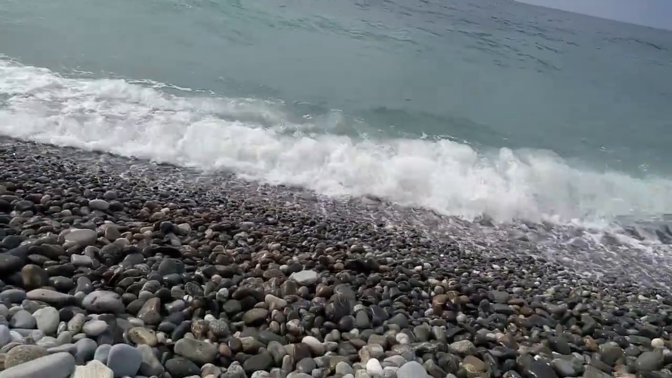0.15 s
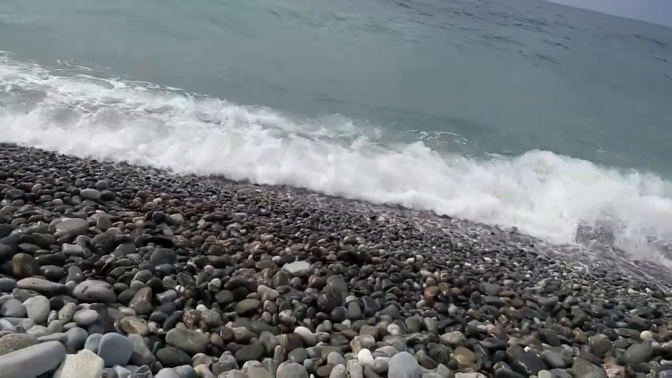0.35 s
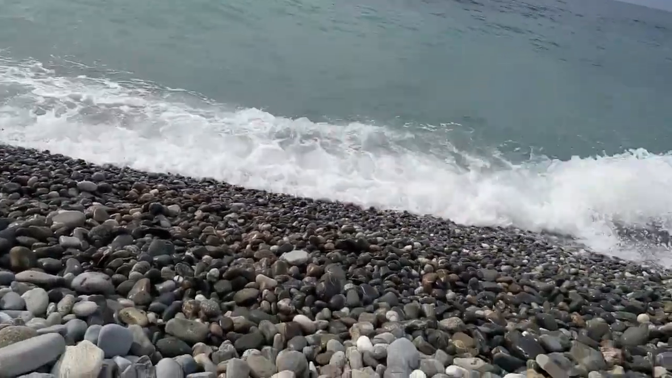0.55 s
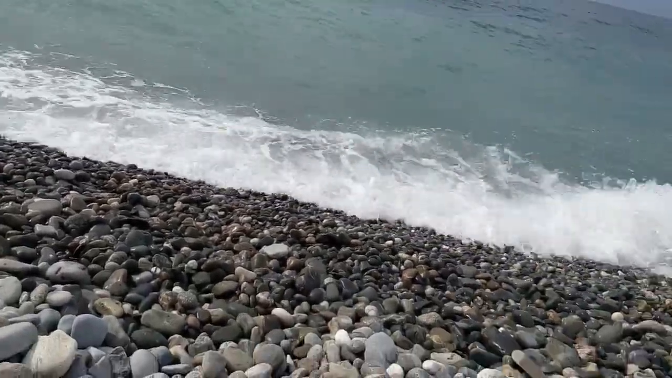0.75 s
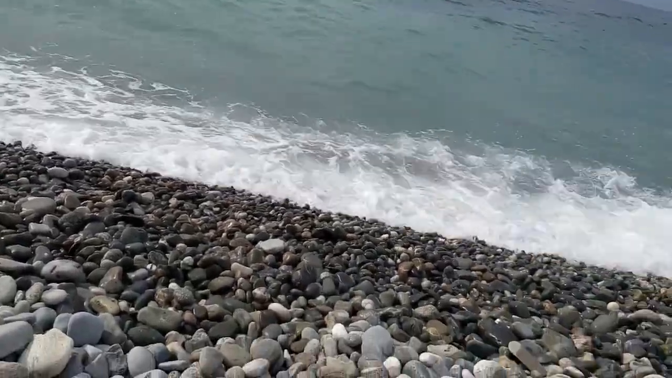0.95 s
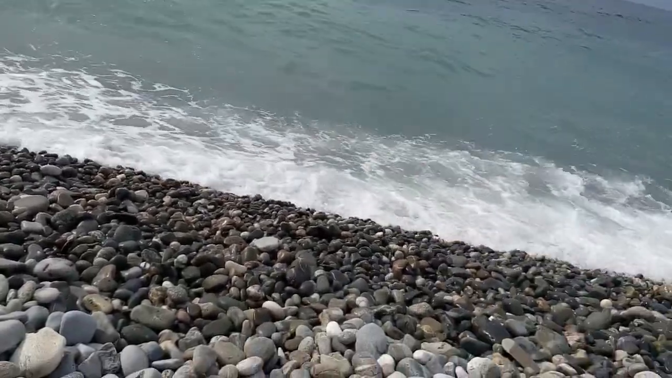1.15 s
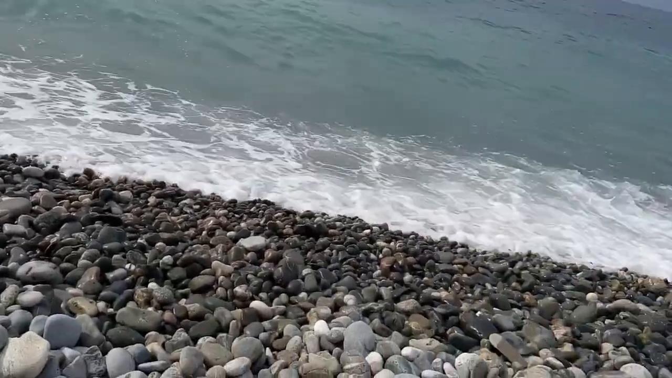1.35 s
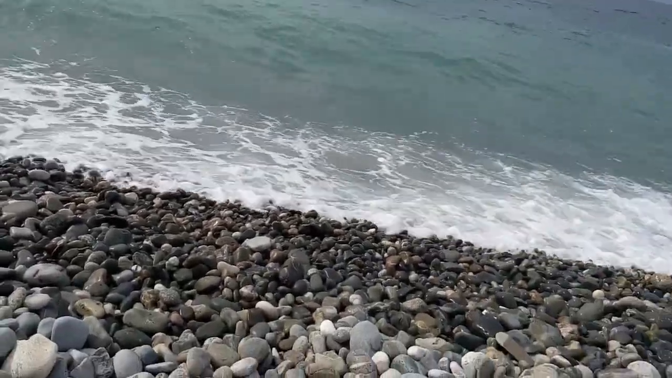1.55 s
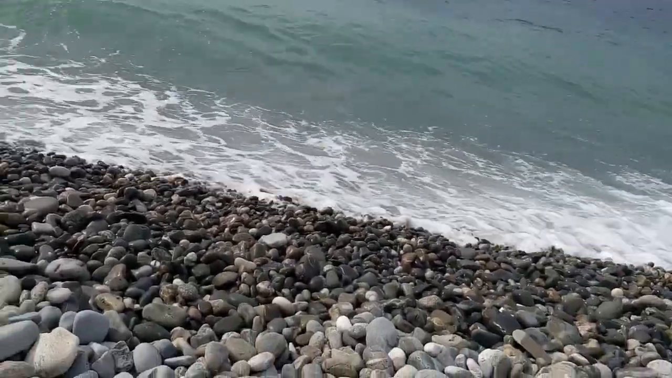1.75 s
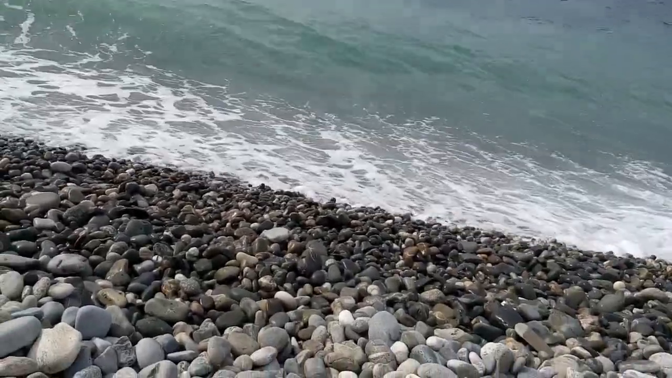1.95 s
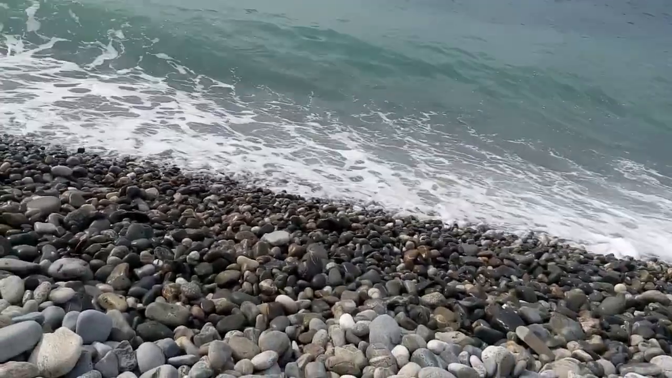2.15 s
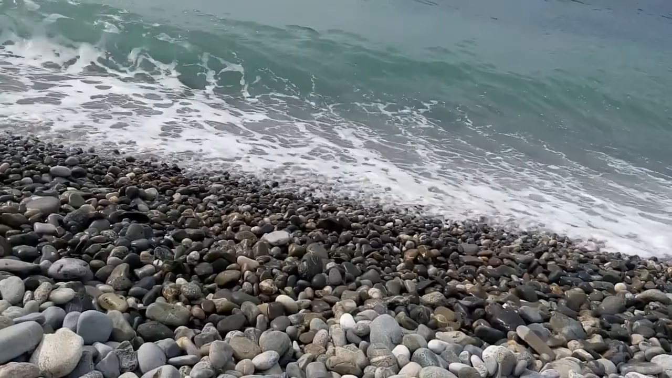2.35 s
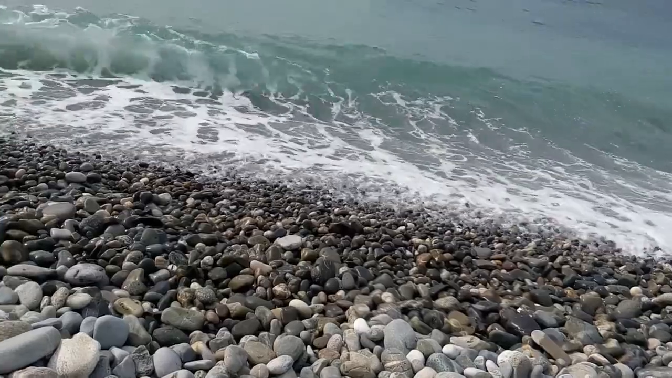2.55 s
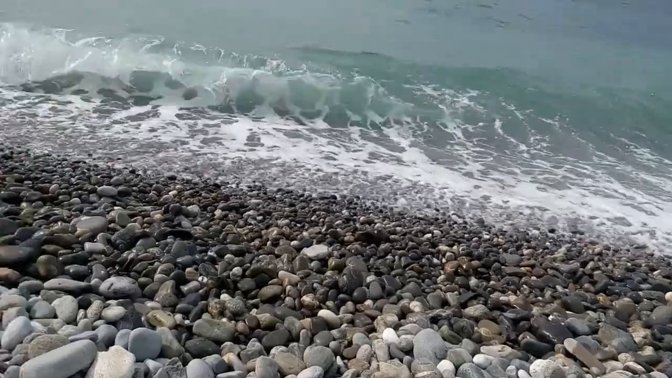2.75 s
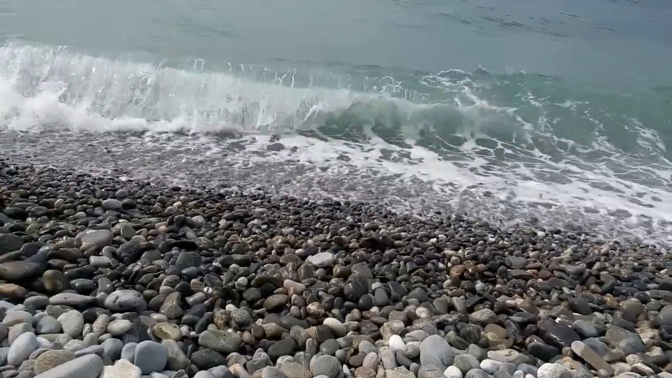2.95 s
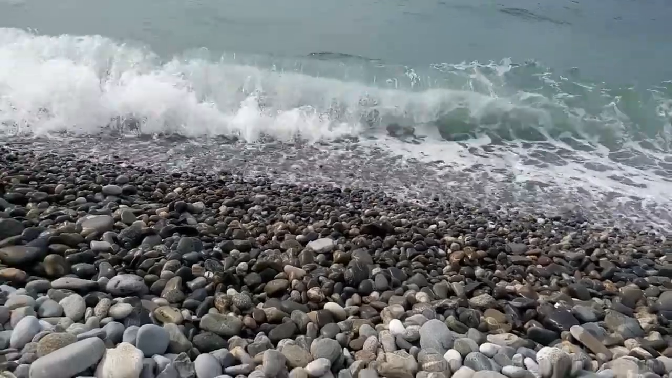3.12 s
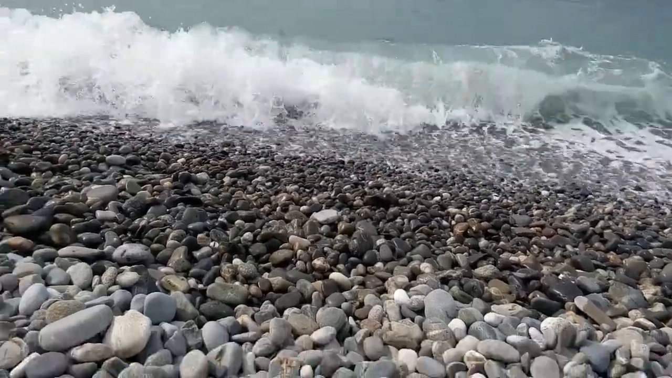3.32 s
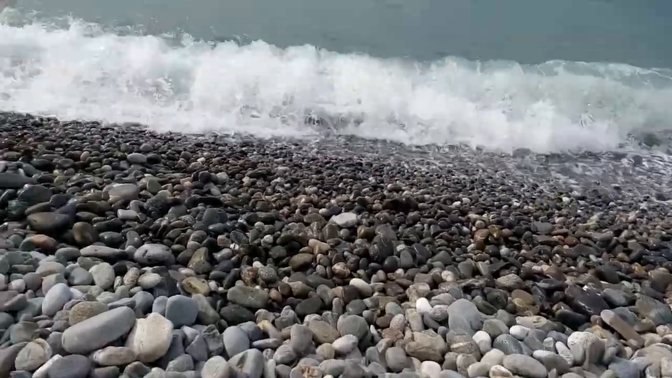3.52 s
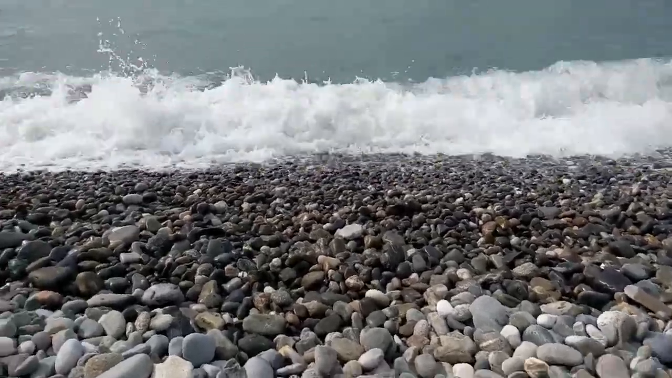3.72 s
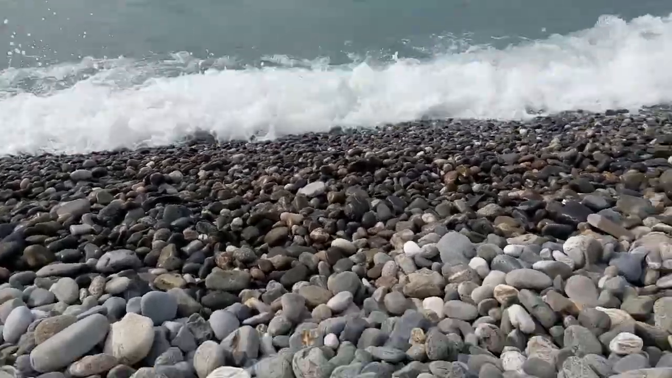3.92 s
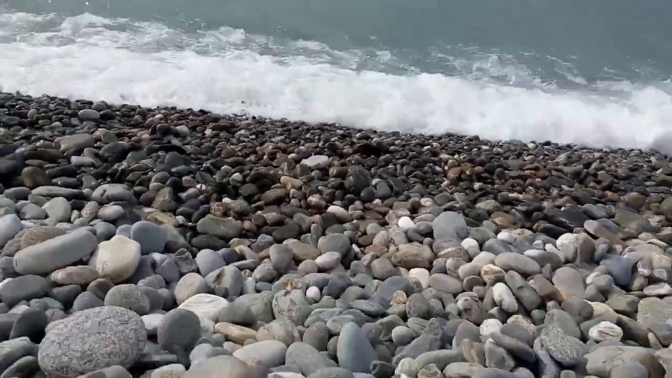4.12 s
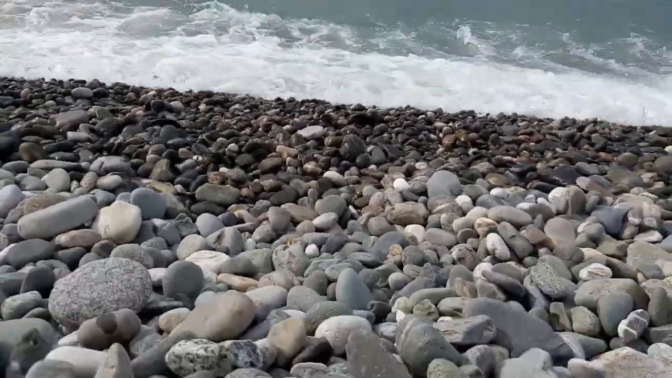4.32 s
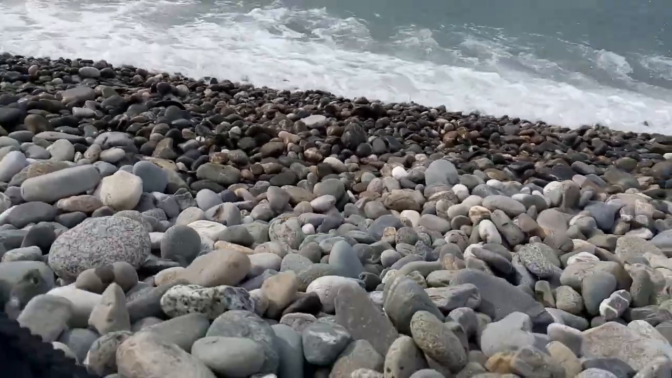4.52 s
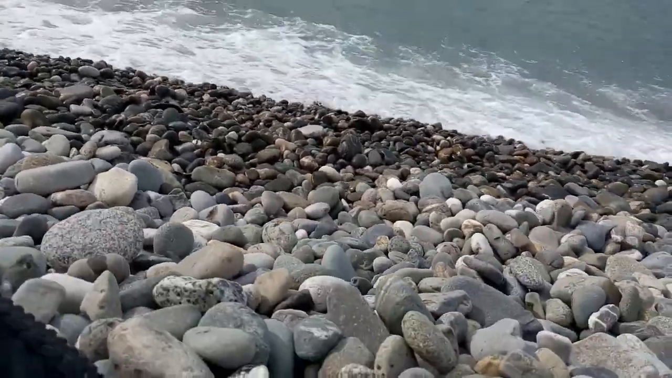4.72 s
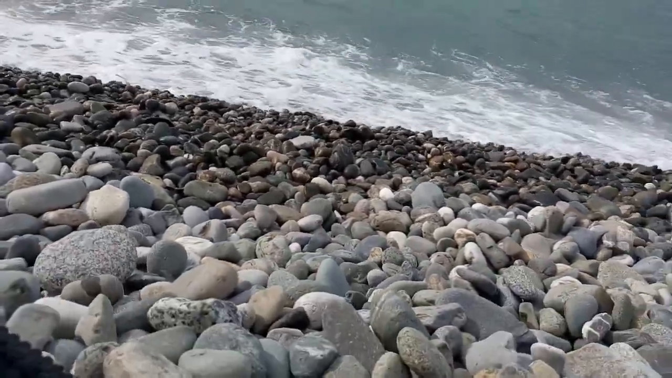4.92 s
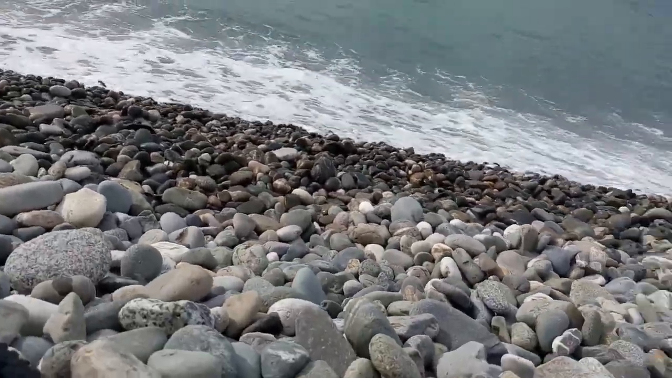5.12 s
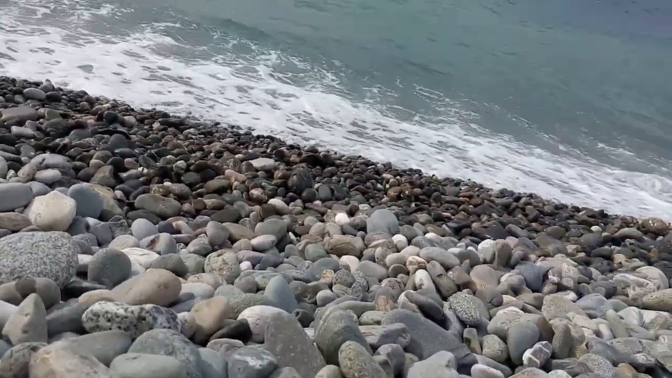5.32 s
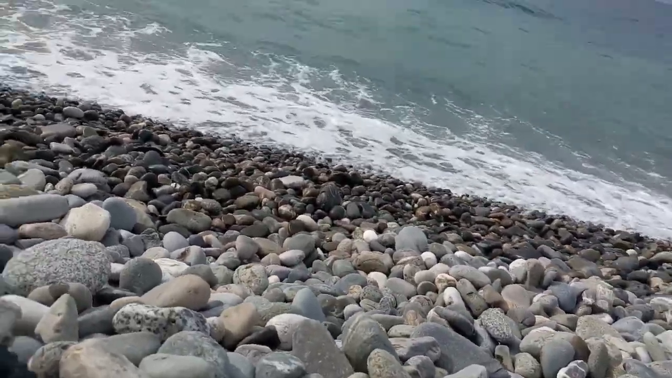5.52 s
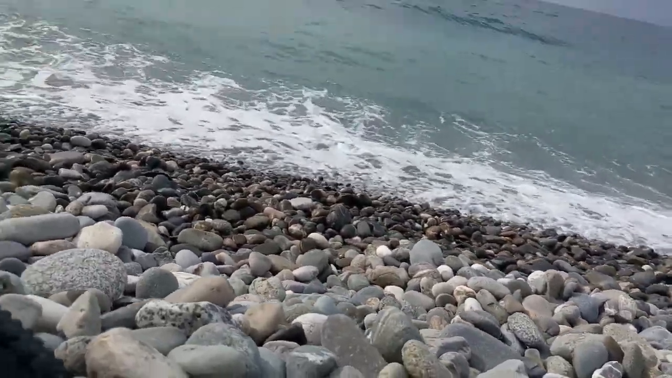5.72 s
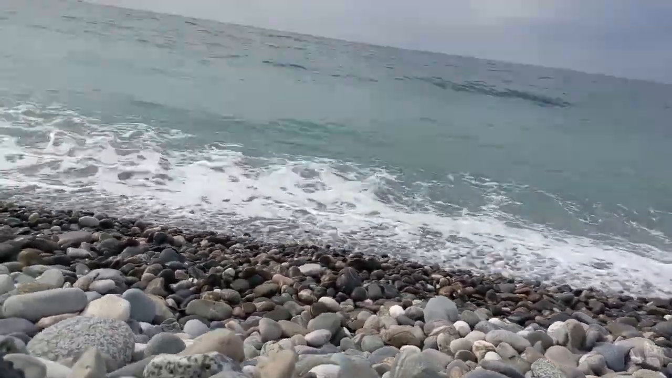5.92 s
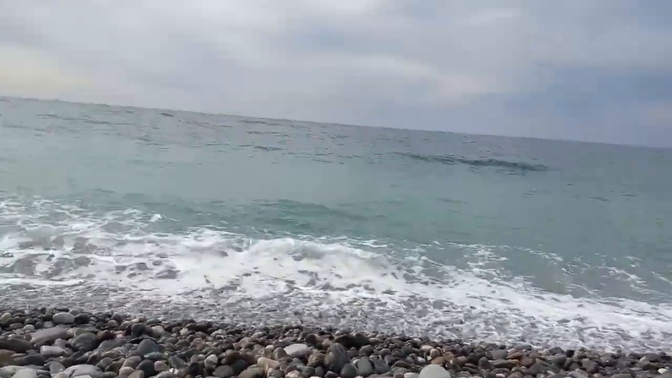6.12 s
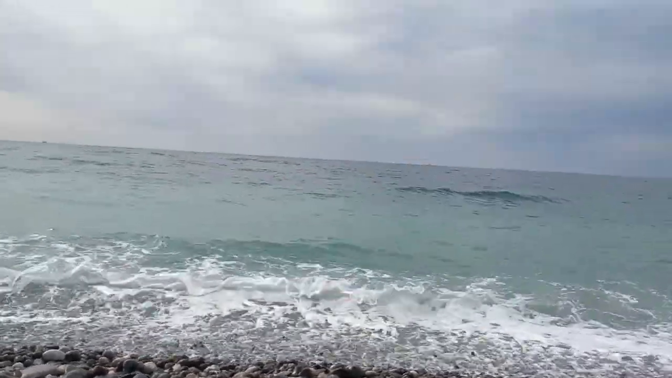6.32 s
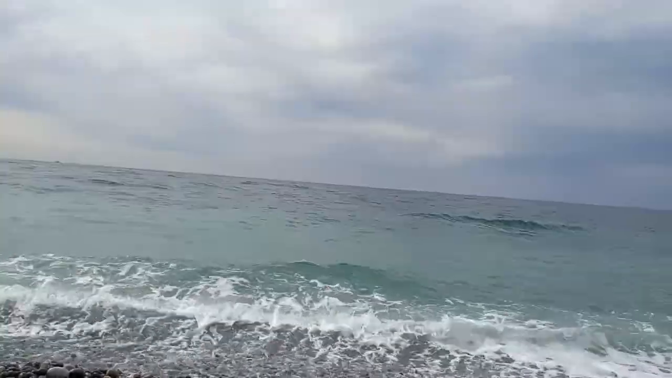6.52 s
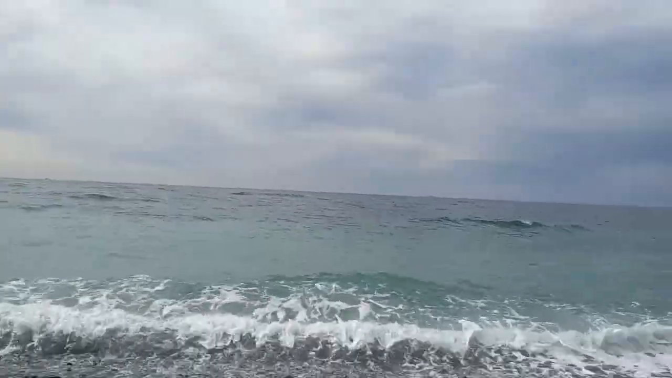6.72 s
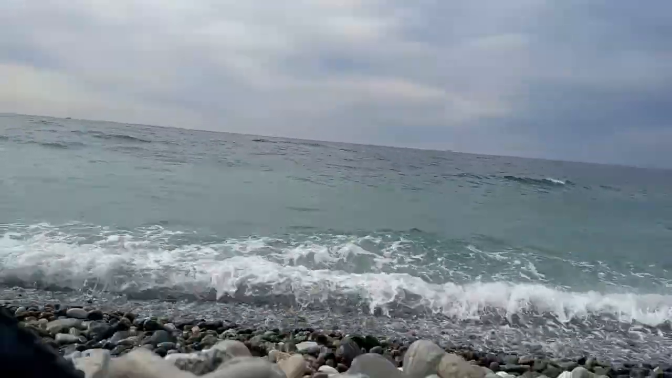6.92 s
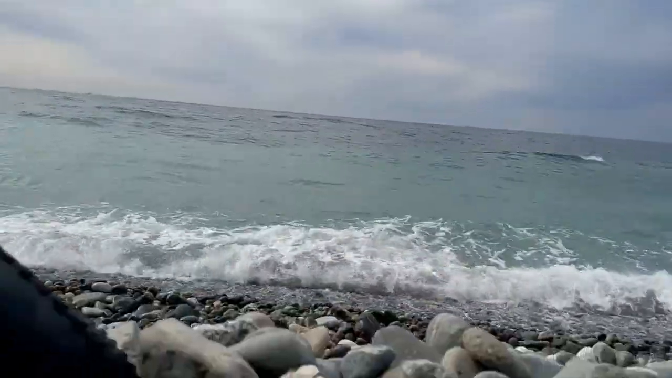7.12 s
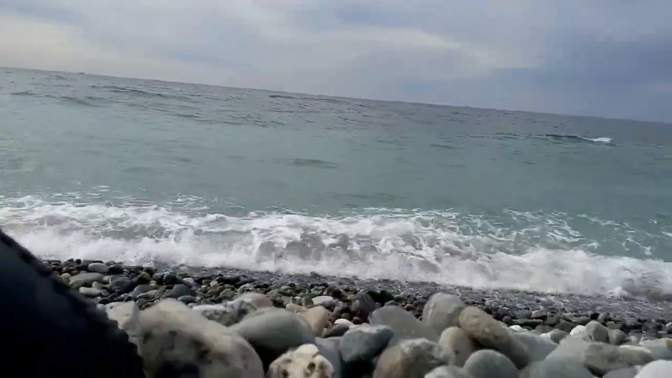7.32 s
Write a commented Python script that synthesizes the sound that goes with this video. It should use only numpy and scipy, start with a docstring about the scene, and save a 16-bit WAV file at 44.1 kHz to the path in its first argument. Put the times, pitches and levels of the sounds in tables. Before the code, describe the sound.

Close to the waterline on a steep pebble beach, a wave breaks with low thuds, churning water and fizzing foam while pebbles rattle. It eases, then a second, stronger breaker crashes and churns before fading. Several dry stone clicks and one hard knock sound right beside a small stereo recorder, followed by softer wash and tiny drops of spray.

```python
"""A steep pebble beach, heard a few steps from the breaking waves through a small two-port recorder. Breakers
thud and churn, throw spray and leave fizzing foam; the backwash drags pebbles in a dense rattle. Water and
pebbles are crowds of random bursts ringing at many pitches, with air pockets pulsing as swelling tones. A few
close stones click as short rings and two drops of spray chirp upwards; late on the recorder is turned."""
import sys
import numpy as np
from scipy import signal
from scipy.fft import rfft, irfft, next_fast_len
from scipy.io import wavfile

SR = 44100
rng = np.random.default_rng(int(sys.argv[2]) if len(sys.argv) > 2 else 0)


def to_wav(s):
    """Save 16-bit WAV."""
    ch = np.atleast_2d(s).T  # columns
    pcm = np.round(np.clip(ch, -1, 1) * 32767)  # PCM
    wavfile.write(sys.argv[1], SR, pcm.astype(np.int16))


N = 328986   # length in samples
FFT_LENGTH = next_fast_len(N)
HZ = np.maximum(np.fft.rfftfreq(FFT_LENGTH, 1 / SR), 1)   # pitch of every frequency bin


def from_db(db):
    """Turn dB into gain: every 20 dB is a factor of ten."""
    return 10 ** (np.asarray(db) / 20)


def in_time(rows):
    """Draw straight lines between the rows of a time table, giving each column at every sample."""
    seconds, *columns = np.transpose(rows)
    return [np.interp(np.arange(N) / SR, seconds, column) for column in columns]


def on_hz(rows):
    """Draw lines between the rows of a pitch table, even per octave, giving each column at every bin."""
    hz, *columns = np.transpose(rows)
    return [np.interp(np.log(HZ), np.log(hz), column) for column in columns]


def drift(rate_hz):
    """Smooth noise twice to get a slow random wander of spread 1."""
    step = 40   # samples between points of the wander
    r = np.exp(-2 * np.pi * rate_hz * step / SR)
    noise = rng.standard_normal(N // step + 2002)
    slow = signal.lfilter([1], [1, -2 * r, r * r], noise)[2000:]   # skip the start-up
    return np.interp(np.arange(N) / step, np.arange(len(slow)), slow / slow.std())


def ring(clicks, hz, t60):
    """Let each click start a dying sine, like a struck object; it falls 60 dB in t60 seconds."""
    r, w = from_db(-60 / (t60 * SR)), 2 * np.pi * hz / SR
    return signal.lfilter([0, np.sin(w)], [1, -2 * r * np.cos(w), r * r], clicks + 1e-18)


def random_bursts(chance, spread_db, clumps_db):
    """Start bursts at random moments with random sign and size, stronger or weaker in clumps."""
    luck = rng.uniform(-1, 1, (2, N)) / chance
    born = np.abs(luck) < 1
    rarity = np.minimum(-np.log(np.abs(luck[born])), 5)   # spread_db sets how rarity changes the size
    clicks = np.zeros((2, N))
    clicks[born] = np.sign(luck[born]) * from_db(spread_db * rarity + clumps_db[np.nonzero(born)[1]])
    return clicks


# How the two ports hear the shore.
# Each row: pitch in Hz, likeness of the ports from 0 to 1, lead of the right port in radians.
PORTS = [(40, .92, 2.35), (90, .985, 2.38), (200, .97, 2.47), (400, .88, 2.4), (550, .68, 2.3),
         (750, .5, 2.3), (950, .52, 2.5), (1150, .4, 2.3), (1350, .25, 1.5), (1500, .4, 0),
         (1850, .52, .15), (2050, .15, .5), (7300, .05, 2.5)]
# Balance of the ports. Each row: pitch in Hz, left minus right in dB.
BALANCE = [(40, .5), (80, 2.2), (170, 3.4), (400, 4.7), (750, 4.5), (950, 3.2), (1250, 7), (1500, 7),
           (1900, 3.5), (2200, 2.5), (2650, 4.5), (3150, 3), (3800, 6), (5500, -1), (6500, -1), (6800, 2),
           (7300, 6)]


def grains(colour, per_s, spread_db, cycles, clump_db, clump_rate, count):
    """Many tiny impacts excite rings spread over the colour, heard by both ports; overall rms is 1."""
    shore, together = np.zeros((2, N)), drift(clump_rate)
    for hz in np.geomspace(colour[1][0], colour[-2][0], count):
        clumps_db = clump_db * (together + 0.14 * drift(clump_rate))
        clicks = random_bursts(per_s / (count * SR), spread_db, clumps_db)
        shore += ring(clicks, hz, cycles / hz) * hz   # higher rings are shorter and wider
    (alike, lead), (left_db,) = on_hz(PORTS), on_hz(BALANCE)
    near, far = rfft(shore, FFT_LENGTH) * from_db(on_hz(colour)[0])
    # the right port shares part of the left sound and fills up with its own
    right = alike * np.exp(1j * lead) * near + np.sqrt(1 - alike ** 2) * far
    pair = irfft([near * from_db(left_db / 2), right * from_db(-left_db / 2)], FFT_LENGTH)[:, :N]
    return pair / pair.std()


# Breaking water. Each row: time in seconds, foam in dB, spray in dB.
SURF = [(0, -28, -44), (.4, -27.5, -45), (.7, -30, -46.5), (1.08, -29.5, -47), (1.22, -34, -51),
        (1.6, -38, -58.5), (2.1, -36.5, -60), (2.5, -33.5, -60), (2.75, -32, -54), (2.97, -25.5, -44.5),
        (3.4, -26.5, -42.5), (3.85, -25.5, -45.5), (4.02, -30.5, -46.5), (4.6, -31.5, -50.5),
        (4.64, -38, -55), (5, -43.5, -61.5), (5.4, -42.5, -63), (5.65, -39, -63), (6.0, -37, -63),
        (6.35, -35, -57.5), (7.0, -38.5, -57.5), (7.46, -39.5, -53)]
# Body of the water. Each row: time in seconds, thud in dB, churn in dB, slosh in dB.
BODY = [(0, -36, -28, -32), (.25, -30.5, -29, -28.5), (.45, -30.5, -26, -27), (.75, -29.5, -22.5, -31),
        (.92, -32.5, -24.5, -27.5), (1.15, -31.5, -26, -30.5), (1.3, -33, -28.5, -28.5),
        (1.5, -35, -27.5, -29.5), (1.7, -40.5, -29, -31), (1.9, -36, -31.5, -33), (2.25, -39.5, -33.5, -32),
        (2.6, -36, -31.5, -31.5), (2.8, -34, -31.5, -29.5), (2.9, -35, -30, -29.5), (2.94, -27, -26, -25),
        (3.0, -26, -25.5, -26), (3.15, -26.5, -24, -27.5), (3.3, -29.5, -24, -28), (3.5, -26, -21.5, -29),
        (3.7, -27.5, -24.5, -29), (3.87, -26, -23, -22.5), (4.0, -28, -26, -29), (4.2, -26.5, -26, -29),
        (4.45, -32, -24.5, -27.5), (4.75, -34, -27.5, -29.5), (5.0, -37.5, -30.5, -32.5),
        (5.4, -36.5, -33, -32.5), (5.6, -41, -33.5, -30), (5.8, -37, -34, -31.5), (6.15, -39, -33.5, -31.5),
        (6.35, -35.5, -33, -32.5), (6.6, -36, -30.5, -32.5), (6.85, -35.5, -32, -34.5),
        (7.0, -34.5, -31.5, -36.5), (7.2, -37, -30, -33), (7.46, -35, -32, -32.5)]
# Backwash. Each row: time in seconds, large, middle and small pebbles in dB.
DRAG = [(0, -22, -23.5, -25.5), (.15, -21.5, -25, -24.5), (.3, -24.5, -25, -25.5), (.4, -24, -29, -27.5),
        (.55, -27, -32, -30), (1.08, -29.5, -36.5, -32.5), (1.22, -31, -39.5, -36.5),
        (1.7, -33, -45.5, -39), (2.0, -32.5, -40, -36), (2.25, -27.5, -34, -31.5), (2.5, -23.5, -31, -28),
        (2.75, -23.5, -25.5, -23.5), (2.92, -19.5, -27, -22.5), (3.1, -22, -23, -21.5),
        (3.4, -21.5, -25, -22.5), (3.72, -25, -26, -24), (3.82, -24.5, -29.5, -30.5),
        (3.89, -25.5, -31.5, -25.5), (4.02, -30, -35, -32.5), (4.6, -32, -40, -35.5),
        (4.625, -33.5, -43, -40), (4.69, -33, -42, -39), (4.72, -35, -44, -43), (5.0, -35, -46, -44.5),
        (5.3, -32.5, -41, -42), (5.5, -27, -36.5, -37), (5.75, -28.5, -33, -33), (6.0, -30, -32, -31.5),
        (6.35, -28, -32.5, -31), (6.7, -28, -32.5, -33), (7.1, -29, -35, -36), (7.46, -34, -41, -42)]


def levels():
    """Give the rise and fall of every water and pebble layer in dB, by name."""
    names = "foam", "spray", "thud", "churn", "slosh", "large", "middle", "small"
    return dict(zip(names, in_time(SURF) + in_time(BODY) + in_time(DRAG)))


# The breaker runs along the shore. Each row: time in seconds, how much earlier the right port hears in ms.
BEARING = [(0, 0.059), (.6, .05), (1.0, -0.077), (1.7, -0.18), (2.5, -0.0097), (3.1, 0.29), (3.5, 0.2),
           (3.9, 0.019), (5, -0.13), (5.9, 0.047), (6.8, 0.23), (7.46, 0.22)]


def along_shore(pair):
    """Sound from along the shore reaches the right port a little early or late."""
    moment = np.arange(N) + in_time(BEARING)[0] * SR / 1000
    return np.array([pair[0], np.interp(moment, np.arange(N), pair[1])])


# Colour of the foam. Each row: pitch in Hz, strength in dB.
FOAM = [(2000, -74), (3500, -4.5), (5000, 1.5), (6500, 4), (7300, -4), (8000, -17), (9000, -42)]


def foam():
    """Foam bubbles burst in a fizz that leans to the right as the backwash pulls harder."""
    now = levels()
    fizz = grains(FOAM, per_s=25000, spread_db=3.0, cycles=5.1, clump_db=0.85, clump_rate=13.6, count=6)
    lean_db = -0.5 - 0.22 * (now["large"] + 19)   # added to left minus right
    return fizz * from_db(now["foam"] + [lean_db / 2, -lean_db / 2])


# Colour of the slosh. Each row: pitch in Hz, strength in dB.
SLOSH = [(350, -18), (550, -5), (700, -3), (850, -2), (1050, -4.5), (1250, -8.5), (1900, -16)]


def slosh():
    """Water slops about among the pebbles in clumps of short, mid-pitched rings."""
    wet = grains(SLOSH, per_s=3000, spread_db=2.5, cycles=7.8, clump_db=-1.0, clump_rate=20.0, count=6)
    return along_shore(from_db(levels()["slosh"]) * wet)


# Colour of the spray. Each row: pitch in Hz, strength in dB.
SPRAY = [(7000, -30), (8000, -19), (8400, 0.5), (11000, -6), (14000, -11), (15100, -14), (16000, -36)]


def spray():
    """Countless droplets make a faint high hiss that reaches the right port only."""
    hiss = grains(SPRAY, per_s=30000, spread_db=-1.0, cycles=8.0, clump_db=1.5, clump_rate=14.0, count=7)
    return from_db(levels()["spray"]) * hiss * [[0], [1]]


# Drops of spray landing close by. Each row: start in seconds, rough left peak in dB,
# rough right peak in dB, first pitch in Hz, swell in ms.
DROPS = [(6.3166, -21, -9, 4600, 1.9), (6.3526, -28, -19, 4600, 2.0)]


def drops():
    """A drop splats, then a tiny trapped bubble sings a note that swells, climbs and dies."""
    rise_hz_per_ms, fade_ms, splat_db = 400, .5, -28
    out, ms = np.zeros((2, N)), np.arange(300) * 1000 / SR
    for s, left_db, right_db, hz, swell_ms in DROPS:
        swelling, fading = .4 + .6 * ms / swell_ms, np.exp((swell_ms - ms) / fade_ms)
        shape = np.where(ms < swell_ms, swelling, fading)
        drop = shape * np.sin(2 * np.pi * np.cumsum(hz + rise_hz_per_ms * ms) / SR)
        drop += from_db(splat_db) * rng.standard_normal(len(ms)) * np.exp(-ms / swell_ms)
        out[:, round(s * SR):][:, :len(ms)] += from_db([[left_db], [right_db]]) * drop
    return out


# Loose stones close by. Each row: snap in seconds, rough left peak in dB, rough right peak in dB,
# delay of the right port in ms, brightest pitch in Hz, grind in ms.
STONES = [(4.6063, -14, -21, 0, 4500, .7), (4.6134, -10.5, -18, .8, 5800, .5),
          (4.628, -18, -24, .5, 6700, .6), (4.6920, -14, -20, .6, 5000, .8),
          (5.0212, -24, -22, .5, 3600, .8), (5.5772, -18, -30, .5, 6300, .8),
          (5.6371, -12.5, -17.5, .3, 6300, .6), (5.645, -24, -24, .3, 6000, .8),
          (5.6608, -23, -26, .4, 6000, .8)]
# Pitches at which a stone rings, in Hz.
STONE_MODES = [2900, 3900, 4800, 5300, 5900, 6700]


def stones():
    """Each contact grinds ever harder, then snaps into stone rings, strongest near its brightest pitch."""
    edge_db, fall_db_per_octave, grind_db, t60_s = -24, 15, -12, .002
    lead_in = 200   # samples of grinding before the snap
    out, ms = np.zeros((2, N)), np.arange(-lead_in, 400) * 1000 / SR
    band = signal.butter(3, [2300, 7300], "band", fs=SR, output="sos")
    for s, left_db, right_db, late_ms, bright_hz, grind_ms in STONES:
        grind = from_db(grind_db) * rng.standard_normal((2, len(ms))) * np.exp(-np.abs(ms) / grind_ms)
        push = (ms == 0) + grind * np.where(ms < 0, 1, .5)   # the grind is halved from the snap on
        rung = np.zeros((2, len(ms)))
        for hz in STONE_MODES:
            octaves_off = abs(np.log2(hz / bright_hz))
            rung += from_db(-fall_db_per_octave * octaves_off) * ring(push, hz, t60_s)
        rung = signal.sosfilt(band, rung)
        click = rung / np.abs(rung).max(1, keepdims=True) + from_db(edge_db) * push
        out[0, round(s * SR) - lead_in:][:len(ms)] += from_db(left_db) * click[0]
        out[1, round((s + late_ms / 1000) * SR) - lead_in:][:len(ms)] += from_db(right_db) * click[1]
    return out


# Rings of the hard knock. Each row: pitch in Hz, left level in dB and right level in dB before
# the filters, time to fall 60 dB in seconds.
KNOCK_MODES = [(1000, 1.5, -20, .008), (1900, -3, -24, .003), (4600, -6, -17, .003), (6200, -2, -12, .002)]
# Delays in seconds of the thin, quick triple at the right port.
KNOCK_RIGHT_S = [.00025, .00062, .0011]


def knock():
    """One stone knocks hard right at the left port and rings at a few pitches."""
    start_s = 5.5890
    blow = np.zeros((2, N))
    blow[0, round(start_s * SR)] = 1
    blow[1, ((start_s + np.array(KNOCK_RIGHT_S)) * SR).astype(int)] = 1
    out = np.zeros((2, N))
    for hz, left_db, right_db, t60 in KNOCK_MODES:
        out += from_db([[left_db], [right_db]]) * ring(blow, hz, t60)
    out[1] = signal.lfilter(*signal.butter(4, 7200, fs=SR), out[1])   # shaded by the recorder's body
    return signal.lfilter(*signal.butter(3, 720, "high", fs=SR), out)


# Colours of the large, middle and small pebbles. Each row: pitch in Hz, strength in dB.
LARGE = [(500, -14.5), (900, -7), (1150, -2), (1400, 0), (1750, -1.5), (2000, -3.5), (2200, -13),
         (3000, -38)]
MIDDLE = [(1500, -5), (2000, -20), (2200, -4), (2650, -1.5), (3000, -3), (3400, -10), (5000, -17)]
SMALL = [(2200, -28), (2900, -8.5), (3300, -2.5), (3900, -4), (4500, -4.5), (5200, -8.5), (7500, -33)]
# The backwash moves along the beach. Each row: time in seconds, then left minus right in dB,
# added for the large pebbles and for the smaller pebbles.
PEBBLE_LEAN = [(0, -0.17, 1.5), (.7, 1.5, 1), (1.6, 2.2, 0.5), (2.4, 1.5, -2), (3, 0.78, 0), (3.8, 1, 1),
               (4.6, 1.5, 2.5), (5.3, 1.3, -2.5), (5.7, 1, -0.5), (7.46, 0, 0)]


def pebbles():
    """The backwash knocks thousands of pebbles together a second; smaller ones ring higher."""
    now = levels()
    large = grains(LARGE, per_s=4000, spread_db=2.0, cycles=9.2, clump_db=0.85, clump_rate=13.5, count=7)
    middle = grains(MIDDLE, per_s=6000, spread_db=2.5, cycles=16.0, clump_db=0.74, clump_rate=18.0, count=6)
    small = grains(SMALL, per_s=8000, spread_db=3.0, cycles=13.0, clump_db=1.2, clump_rate=22.0, count=6)
    large_lean, smaller_lean = (from_db(lean_db * [[.5], [-.5]]) for lean_db in in_time(PEBBLE_LEAN))
    smaller = from_db(now["middle"]) * middle + from_db(now["small"]) * small
    return from_db(now["large"]) * large * large_lean + smaller * smaller_lean


# Air pockets. Each row: start in seconds, left peak in dB, pitch in Hz, length in seconds.
PLUNGES = [(.05, -18.5, 170, 0.05), (.26, -17, 180, 0.045), (.385, -20.5, 110, 0.076),
           (.448, -16, 94, 0.065), (.68, -21, 100, .05), (2.925, -21, 85, .05), (2.958, -16, 127, 0.058),
           (3.062, -18, 140, 0.037), (3.151, -10, 700, 0.011), (3.315, -16, 269, 0.036),
           (3.43, -20, 143, 0.048), (3.51, -22.5, 132, .05), (4.155, -17, 125, 0.035),
           (6.3, -24, 150, 0.038), (6.77, -22.5, 168, 0.021)]


def plunges():
    """Air pockets under the crest pulse briefly, the deep ones nearly opposite at the two ports."""
    t, out = np.arange(N) / SR, np.zeros((2, N))
    for s, peak_db, hz, length in PLUNGES:
        swell = np.sin(np.pi * np.clip((t - s) / length, 0, 1)) ** 2
        lead = np.interp(hz, *np.transpose(PORTS)[::2])
        pulse = np.sin(2 * np.pi * hz * (t - s) + np.array([[0], [lead]]))
        out += from_db(peak_db) * swell * pulse
    return out * [[1], [.7]]   # softer at the right port


# Colours of the thud and the churn. Each row: pitch in Hz, strength in dB.
THUD = [(20, -31), (33, -19), (45, -14), (62, -8.5), (80, -3.5), (105, 0.5), (140, 0), (190, 0.5),
        (260, -11), (500, -43)]
CHURN = [(100, -18), (170, -3.5), (250, -1.5), (330, 0), (420, 0), (520, -3), (650, -5), (1100, -15)]


def breaker():
    """Trapped air thuds deep down while big bubbles churn above it, both as random rings."""
    now = levels()
    thud = grains(THUD, per_s=900, spread_db=2.5, cycles=2.0, clump_db=1.0, clump_rate=1.7, count=7)
    churn = grains(CHURN, per_s=3000, spread_db=1.5, cycles=6.0, clump_db=-0.5, clump_rate=11.0, count=7)
    return along_shore(from_db(now["thud"]) * thud + from_db(now["churn"]) * churn)


# The recorder is turned: start and end of the turn in seconds.
TURN_S = [5.6, 5.68]
# Change of colour once turned. Each row: pitch in Hz, left port in dB, right port in dB.
TURNED = [(700, 1, 0.5), (1050, 2, 4.5), (1400, -1, 2), (1800, 0, -1), (2160, 2, 0.5), (2680, 0, -1.5),
          (3500, -0.5, 0.5), (5530, 1, 1), (6700, 1, -1.5), (8000, -6.5, 0.5)]


def turn(pair):
    """Fade from the colour before the turn to that after it."""
    turned = irfft(rfft(pair, FFT_LENGTH) * from_db(on_hz(TURNED)), FFT_LENGTH)[:, :N]
    return pair + np.interp(np.arange(N) / SR, TURN_S, [0, 1]) * (turned - pair)


def scene():
    """Add up the shore; the turn colours the water and pebbles, not the close stones and drops."""
    shore = foam() + slosh() + spray() + pebbles() + plunges() + breaker()
    return turn(shore) + drops() + stones() + knock()


def record(dry):
    """The left port ends steeply at its edge; peaks clip at full scale; the top of both is cut."""
    left_edge_hz, cutoff_hz = 8340, 15500
    left = signal.sosfilt(signal.cheby2(14, 55, left_edge_hz, fs=SR, output="sos"), dry[0])
    both = np.clip([left, dry[1]], -1, 1)
    return signal.sosfilt(signal.cheby2(20, 60, cutoff_hz, fs=SR, output="sos"), both)


dry = scene()
out = record(dry)
to_wav(out)
```